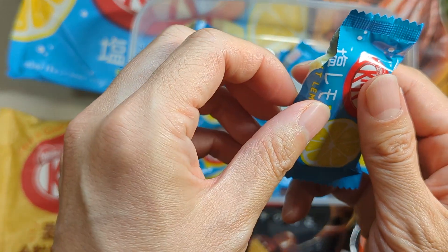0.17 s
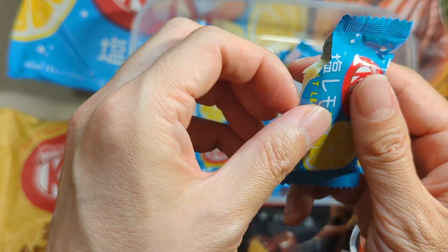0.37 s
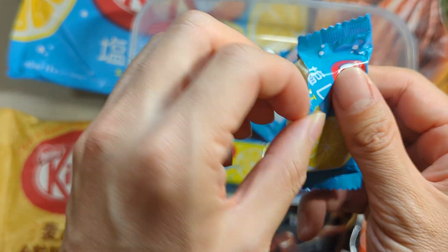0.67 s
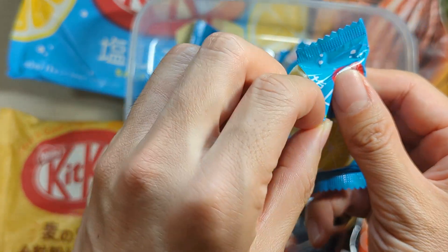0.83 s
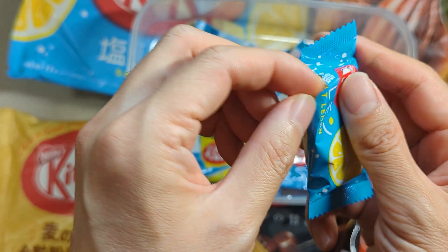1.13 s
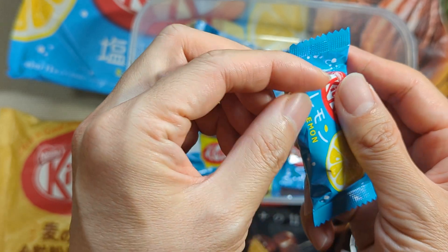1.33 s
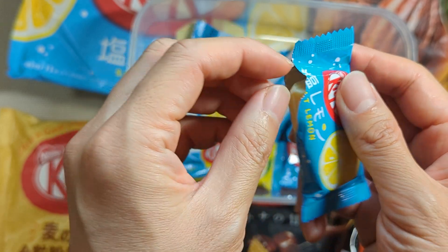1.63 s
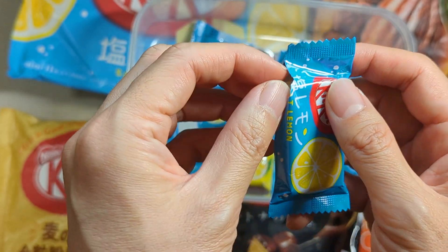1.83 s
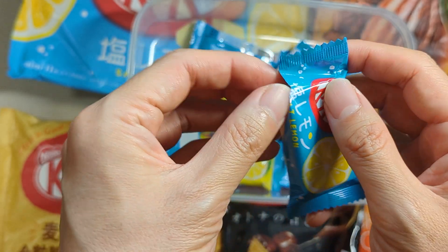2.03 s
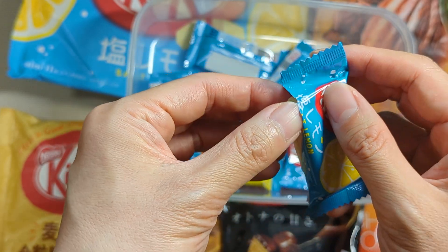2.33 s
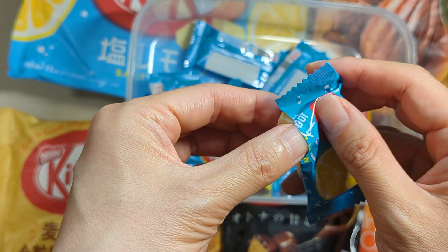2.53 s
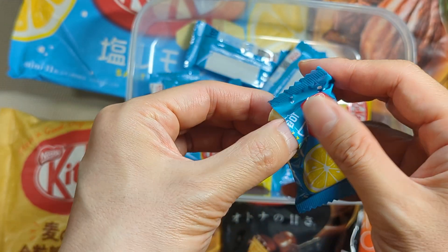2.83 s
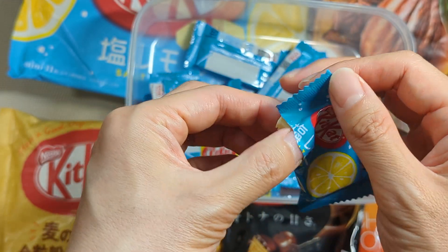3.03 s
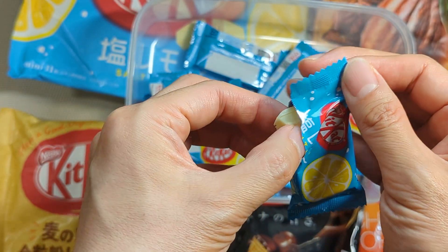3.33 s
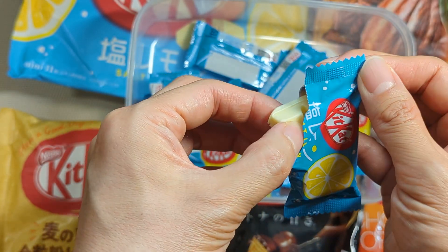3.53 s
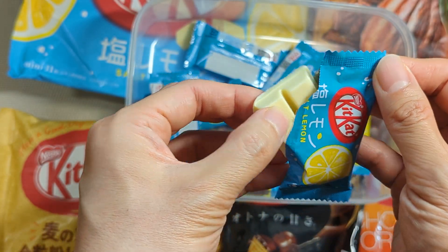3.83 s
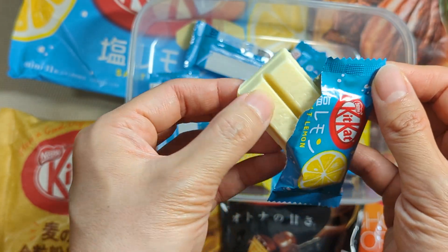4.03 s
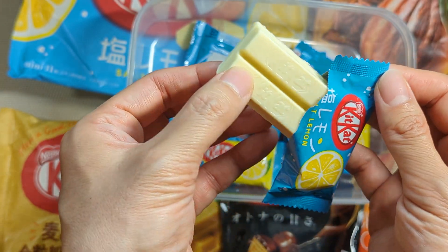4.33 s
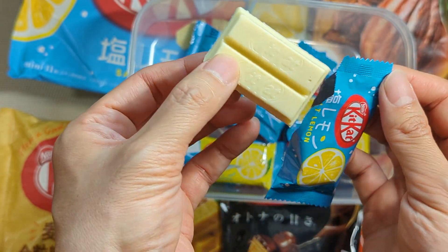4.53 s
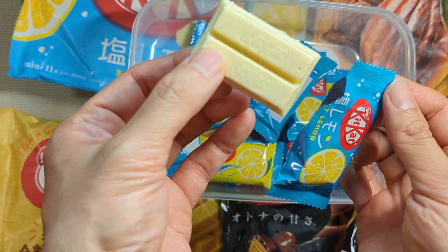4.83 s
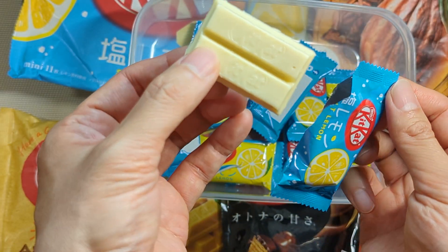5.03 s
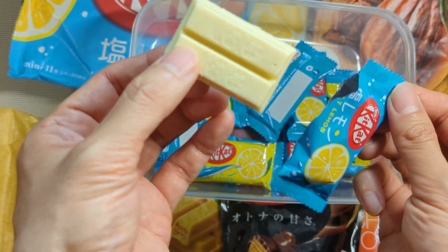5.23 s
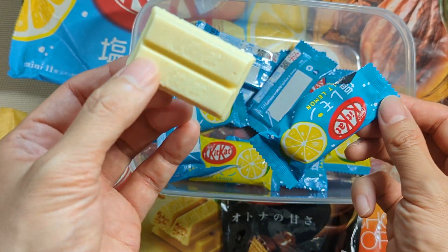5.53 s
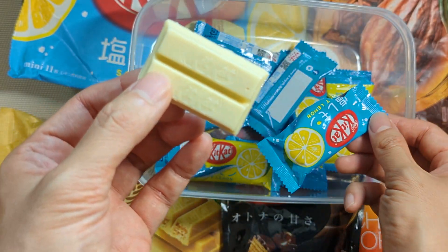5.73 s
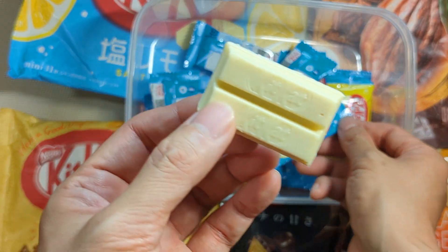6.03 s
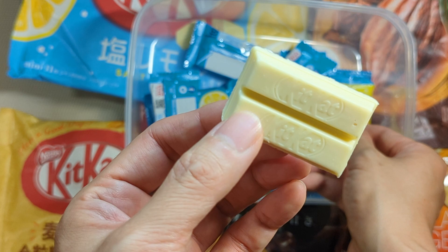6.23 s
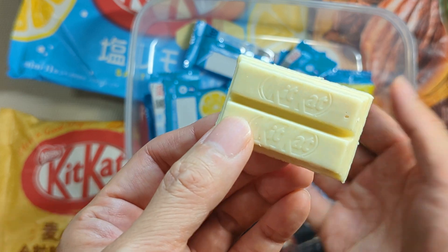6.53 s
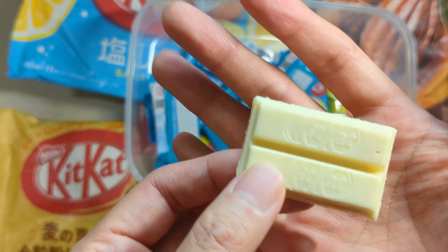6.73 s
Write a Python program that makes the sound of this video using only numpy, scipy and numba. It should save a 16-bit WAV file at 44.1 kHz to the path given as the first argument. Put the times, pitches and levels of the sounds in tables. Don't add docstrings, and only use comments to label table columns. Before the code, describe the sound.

A small plastic snack wrapper is handled very close to a stereo phone microphone in a quiet room with a faint low hum. After a near-silent start, light ticks begin at about 0.15 s, and crisp, irregular crackles gather from 0.35 to 1.35 s, with tiny bright rips near 0.8 and 1.1 s. A lull follows until about 1.7 s. From 2.1 s the film tears in dense rustling bursts, with a sharp double snap near 2.45 s, then sparser crinkles. From 3.1 to 4.05 s peeling is busiest, with the loudest snaps near 3.43 and 3.54 s and rapid crackling after. Then it thins to faint ticks. A soft fingertip scuff comes just before 5 s, a clear snap at 5.14 s, two crinkles near 5.9 s and final crisp crackles around 6.2 to 6.3 s, fading into quiet hum. Reflections are short and dry.

```python
import sys
import numpy as np
from scipy import signal
from scipy.fft import rfft, irfft, next_fast_len
from scipy.io import wavfile
from scipy.ndimage import uniform_filter1d
from numba import njit

SR = 44100
rng = np.random.default_rng(int(sys.argv[2]) if len(sys.argv) > 2 else 0)


def gain_from_db(level_db):
    decades = np.asarray(level_db, float) / 20
    return 10 ** decades


def waveform_to_disk(signal):
    frames = np.transpose(np.atleast_2d(signal))
    scaled = np.clip(frames, -1, 1) * 32767
    samples = np.round(scaled).astype(np.int16)
    wavfile.write(sys.argv[1], SR, samples)


N = 303849


def snaps(count=32, order=5):
    # (t/s, peak level/dB, loudest panel f/Hz, high panels level/dB)
    crease_snaps = [(0.1583, -37.5, 6150, -20), (0.2676, -54.5, 1350, -12), (0.311, -41, 10100, 21),
                    (0.3436, -44, 10700, -5), (0.3655, -25.5, 1930, 5.5), (0.4392, -42, 1930, -4),
                    (0.5523, -41.5, 1780, -1), (0.5682, -40.5, 2800, -7), (0.5832, -30, 2320, -8),
                    (0.609, -29, 6330, -0.5), (0.6512, -34, 4470, -5), (0.689, -42.5, 2040, -9),
                    (0.7333, -35, 2700, -10), (0.7375, -26, 6450, -4), (0.7577, -29, 1430, -21),
                    (0.7814, -30, 5400, 6), (0.824, -42, 9600, 17), (0.856, -39, 1920, -5),
                    (0.8967, -36.5, 3200, -12), (0.9336, -42.5, 1670, -2), (0.9788, -30.5, 1620, -32),
                    (1.019, -47.5, 2100, -27), (1.07, -40.5, 6160, -19), (1.0858, -25, 6740, -5),
                    (1.1035, -31.5, 8700, -22), (1.184, -41.5, 8860, 9), (1.23, -36.5, 9200, 3),
                    (1.26, -25.5, 1650, 1), (1.3445, -28, 1700, -1.5), (1.464, -39.5, 2580, -7),
                    (1.711, -46, 2360, -2), (1.7392, -45.5, 1600, 2), (1.7587, -43.5, 2010, -9),
               (1.7827, -33.5, 1760, 0), (2.1121, -33.5, 11500, -14), (2.1267, -29, 2140, -14),
               (2.168, -29, 4080, -1), (2.1833, -32, 1030, -6), (2.2, -33.5, 3920, -13),
               (2.2591, -32, 1600, -16), (2.2679, -32, 3880, -18), (2.322, -33, 1810, -18),
               (2.389, -34.5, 1830, -11), (2.4354, -31, 2190, -11), (2.452, -16.5, 8800, -12.5),
               (2.4721, -15.5, 1867, 2.5), (2.5489, -38, 2030, -9), (2.579, -41.5, 1930, -12),
               (2.72, -45.5, 2050, -37), (2.751, -46, 2550, -30), (2.8187, -39.5, 1510, -6),
               (2.8625, -39, 2270, -8), (2.8858, -30, 3740, -13), (2.9147, -31.5, 2190, 4),
               (2.9803, -43, 9900, -15), (3.0031, -28.5, 1350, -28), (3.042, -31, 2770, -7),
               (3.0584, -26.5, 7500, -0.5),
                    (3.1366, -39.5, 2240, -9), (3.1753, -30, 2220, -10.5), (3.227, -18.5, 4590, -6.5),
               (3.2791, -23, 3100, -6), (3.3257, -44, 2300, -13.5), (3.4087, -40, 4420, -21),
               (3.4311, -12, 6110, -6.5), (3.4369, -13.5, 2300, 3), (3.5195, -31.5, 2080, -8.5),
               (3.5375, -15, 6500, -3.5), (3.6117, -20, 4820, -10), (3.64, -41, 2640, -23),
               (3.6701, -30, 2280, -10), (3.69, -31, 1750, -8.5), (3.722, -25, 4020, -13),
               (3.7413, -23, 2530, -13), (3.7533, -31.5, 2330, -19), (3.7775, -33.5, 2310, -12),
               (3.8205, -30.5, 2200, -9.5), (3.8411, -26, 3110, -10.5), (3.8854, -25, 2330, -7.5),
               (3.9032, -27.5, 2500, -11), (3.9219, -25, 3450, -13.5), (3.9632, -37, 4140, -14),
               (4.0012, -21, 4160, -13.5), (4.044, -39.5, 2400, -7.5), (4.068, -41, 3450, -40),
                    (4.1311, -30, 3400, -61), (4.2192, -38, 2010, -17), (4.3468, -43, 2220, -27.5),
                    (4.3648, -40.5, 2500, -36), (4.4355, -53.5, 4050, -26), (4.4894, -44, 2360, -68),
                    (4.5708, -46, 1760, -22), (4.7128, -40.5, 2970, -44), (5.1027, -38.5, 4400, -35),
                    (5.14, -18, 5480, -7.5), (5.6387, -51, 2800, -36), (5.781, -60, 4040, -32),
                    (5.8624, -23, 10150, 4.5), (5.8993, -26.5, 1460, -6.5), (6.1854, -22, 7000, -0.5),
                    (6.2375, -38.5, 4630, -14), (6.2496, -15.5, 2515, -20.5), (6.308, -31, 987, -12),
                    (6.358, -45, 2220, -9), (6.389, -49.5, 1205, -30)]
    creases = np.array(crease_snaps)
    s, db, top_hz, high_db = creases.T[:, :, None, None]
    even = rng.random((2, len(s), order, count))
    bell = rng.standard_normal((4, len(s), order, count))

    harder_db = db + 32
    low_db = -13 - 0.9151 * harder_db - bell[1, :, :1, :1]
    give_s = 0.085 * 2 ** (0.05 * harder_db + 0.19 * bell[2, :, :1, :1])
    give_s = np.clip(give_s, 0.005, 0.3)

    hz = 450 + 15500 * ((np.arange(count) + even[0, :, :1]) / count) ** 1.276
    hz = hz * (1 + 0.055 * bell[3])
    hz[..., :1] = top_hz * (1 + 0.0062 * bell[0, ..., :1])

    low = np.clip(np.log2(3200 / hz), 0, 1.5)
    high = np.clip(np.log2(hz / 6000), 0, 1)
    lowest = np.clip(np.log2(1300 / hz), 0, 2)
    colour = (low_db + 7.5) * low + (high_db + 2.0) * high - 12 * lowest
    colour = colour + 2.0 * bell[0] + 0.77 * bell[0, :, :1]
    colour = np.maximum(colour, 5.0 - 16 * np.abs(np.log2(hz / top_hz)))
    colour[..., 0] = 7.0
    colour -= 10 * np.log10(np.sum(gain_from_db(2 * colour), axis=2, keepdims=True))

    slip = np.arange(order)[:, None]
    later = (slip - 2 + rng.random((len(s), order, 1))) / order
    after = np.where(slip > 1, 0.0014 + 0.27 * give_s * later, 0)
    slip_db = np.where(after > 0, -11.0 - 60 * after / give_s, 0)
    slip_db[:, 0] = -19
    spread_s = np.where(after > 0, 0.008, 0.0006)
    spread_s[:, 0] = -0.0065
    start = s + 0.0008 + after + spread_s * even[1] ** 1.5

    lag_s = 6e-5 + 2.5e-5 * bell[3, :, :1, :1] + 0 * hz
    level_db = db + 2.0 + slip_db + colour
    return ring(start.ravel(), hz.ravel(), level_db.ravel(), cycles=0.57,
                chance=bell[1:3].reshape(2, -1), lag_s=lag_s.ravel(), scatter_db=-0.1, swing=0.99)


def rustle(count=12000, size=5):
    # (t/s, rustle level/dB, brightness/dB per octave)
    hands = [(0.0, -80.5, -4), (0.2, -100, 1), (0.7, -79, 3.5), (1.11, -56, 4), (1.6, -100, -11),
             (1.7, -74, 4), (2.088, -78, -3.5), (2.108, -56, -0.5), (2.33, -55, 1), (2.64, -80.5, -2.5),
             (2.681, -67, 0), (3.079, -51.5, 3), (3.15, -72, -1.5), (3.261, -63, -0.5), (3.82, -63.5, 0.5),
             (4.122, -73.5, -2.5), (4.17, -86.5, -11.5), (4.75, -86, -4)]
    # (start t/s, length/s, rustle level/dB, brightness/dB per octave)
    rips = [(0.198, 0.012, -59.5, 3.5), (0.294, 0.054, -63, 5), (0.81, 0.031, -50, 11),
            (1.083, 0.035, -44, 3), (1.189, 0.1, -49.5, 4), (1.864, 0.037, -67.5, 8),
            (2.155, 0.055, -39.5, 1.5), (2.251, 0.034, -51, 6.5), (2.917, 0.027, -45, 6),
            (2.978, 0.051, -44.5, -2.5), (3.432, 0.018, -33.5, 0.5), (0.033, 0.025, -72.5, -0.5),
            (0.463, 0.057, -77, 6), (2.452, 0.014, -68, 2.5), (5.113, 0.03, -67, -4)]
    # (f/Hz, level/dB per Hz)
    film = [(290, -42), (500, -11), (773, -18), (974, 3), (1060, -7.5), (2190, -4.5), (2980, -8.5),
            (3980, -6.5), (14900, -18.5), (16000, -14.5)]
    when, luck = rng.random((count, 2)).T
    even = rng.random((size, count))
    bell = rng.standard_normal((3, size, count))
    s = when * N / SR

    t, grip_db, grip_tilt = np.transpose(hands)
    db = np.interp(s, t, grip_db, right=-np.inf)
    tilt = np.interp(s, t, grip_tilt)
    for start, length, peak_db, bright_db in rips:
        swell_db = np.interp((s - start) / length, [0, 0.53, 1], [-7, 0, -8.5], left=-np.inf, right=-np.inf)
        pull_db = peak_db + swell_db
        tilt = np.where(pull_db > db, bright_db, tilt)
        db = np.maximum(db, pull_db)

    clump_db = 3.5 * np.interp(s, np.linspace(0, N / SR, num=400), rng.standard_normal(400))
    hz = 500 + 15500 * ((np.arange(size)[:, None] + even) / size) ** 1.3
    db = db + 0.1 + clump_db + 12.0 * luck ** 3
    db = db + on_log(hz, film) + tilt * np.log2(hz / 4000)
    start = s + 0 * hz
    lag_s = 7e-5 + 4e-5 * bell[2, :1] + 0 * hz
    return ring(start.ravel(), hz.ravel(), db.ravel(), cycles=0.66, chance=bell[:2].reshape(2, -1),
                lag_s=lag_s.ravel(), scatter_db=1.5, swing=0.36)


def rub(count=24):
    start_s, length_s, panel_hz, level_db = 4.955, 0.058, 1266, -68
    bell = rng.standard_normal((3, count))
    slip_s = start_s + length_s * rng.random(count)
    hz = panel_hz * (1 + 0.04 * bell[2])
    return ring(slip_s, hz, level_db + 0 * hz, cycles=0.97, chance=bell[:2],
                lag_s=7e-5 + 0 * hz, scatter_db=1.0, swing=0.4)


def ring(s, hz, db, cycles, chance, lag_s, scatter_db, swing):
    out = np.zeros((2, N))
    beam = np.minimum(hz / 5000, 1)
    side = 0.1 + 0.4 * beam + scatter_db * beam * chance[0]
    lead = np.pi * hz * lag_s + swing * beam * chance[1]
    t60 = cycles / hz ** 0.5
    gain = gain_from_db(db + np.array([side, -side]))
    add(out, (s * SR).astype(np.int64), hz, t60, gain, np.array([lead, -lead]))
    return out


@njit
def add(out, start, hz, t60, gain, phase):
    for k in range(len(hz)):
        p = np.exp(2j * np.pi * hz[k] / SR - np.log(1000) / (t60[k] * SR))
        for c in range(2):
            z = gain[c, k] * np.exp(1j * phase[c, k])
            for i in range(start[k], min(start[k] + int(t60[k] * SR), out.shape[1])):
                out[c, i] += z.imag
                z *= p


def on_log(hz, table):
    f, v = np.transpose(table)
    return np.interp(np.log(np.maximum(hz, 1)), np.log(f), v)


def room(x, near_db=-24, near_t60=0.04, wet_db=-38, t60=0.26, dull_hz=9000, cut_s=0.069):
    # (f/Hz, level/dB)
    port = [(200, -15), (500, -10.5), (900, -9.5), (1300, -8), (2200, -1), (3200, -3.5), (4500, -0.5),
            (6500, -0.5), (9000, 2), (11500, 2), (15500, 1)]
    t = np.arange(8192) / SR
    noise = rng.standard_normal((3, len(t)))
    tail = signal.lfilter(*signal.butter(1, dull_hz, fs=SR), noise)
    direct = t == 0
    near = tail[0] * gain_from_db(near_db - 60 * t / near_t60) * np.minimum(t / 0.0013, 1) + direct
    far = tail[1:] * gain_from_db(wet_db - 60 * t / t60) * np.minimum(t / 0.0054, 1)
    far = far / (1 + (t / cut_s) ** 14)

    paths = rfft([near, *far])
    broad = uniform_filter1d(np.abs(paths) ** 2, size=90)
    even_out = np.sqrt(uniform_filter1d(broad, size=900) / broad)
    paths *= even_out * gain_from_db(on_log(np.arange(4097) * SR / 8192, port))
    paths = np.roll(irfft(paths), 256, axis=1) * np.clip((0.17 - t) / 0.03, 0, 1)

    close = signal.fftconvolve(x, paths[:1], axes=1)
    walls = signal.fftconvolve(x.mean(0, keepdims=True), paths[1:], axes=1)
    return (close + walls)[:, 256:N + 256]


def house():
    # (f/Hz, level/dB per Hz)
    hum = [(12, -65.5), (20, -33), (29, -3.5), (44, -11), (102, -1), (135, -13.5), (151, -4.5), (206, -9),
           (251, -14.5), (323, -7), (709, -20), (839, -35), (913, -26), (1430, -39), (16500, -52.5)]
    # (f/Hz, likeness/0-1)
    likeness = [(60, 0.92), (300, 0.96), (640, 0.4), (1400, 0)]
    n = next_fast_len(N)
    hz = np.arange(n // 2 + 1) * SR / n
    mid, side = rfft(rng.standard_normal((2, n))) * gain_from_db(on_log(hz, hum))
    alike = np.clip(on_log(hz, likeness), 0, 1)
    mid = irfft(mid * np.sqrt(1 + alike), n)[:N]
    side = irfft(side * np.sqrt(1 - alike), n)[:N]
    left = 1.097 * (mid + side)
    right = 1.027 * np.roll(mid - side, shift=3)
    return np.array([left, right]) * gain_from_db(-61) / np.std(mid)


def scene():
    return room(snaps() + rustle() + rub()) + house()


def top_cut(x):
    return signal.sosfilt(signal.butter(12, 16990, fs=SR, output="sos"), x)


def record(dry):
    x = signal.sosfilt(signal.butter(6, 40, "high", fs=SR, output="sos"), dry)
    x = signal.sosfilt(signal.ellip(8, 0.2, 26, 15800, fs=SR, output="sos"), x)
    return top_cut(x)


dry = scene()
out = record(dry)
waveform_to_disk(out)
```